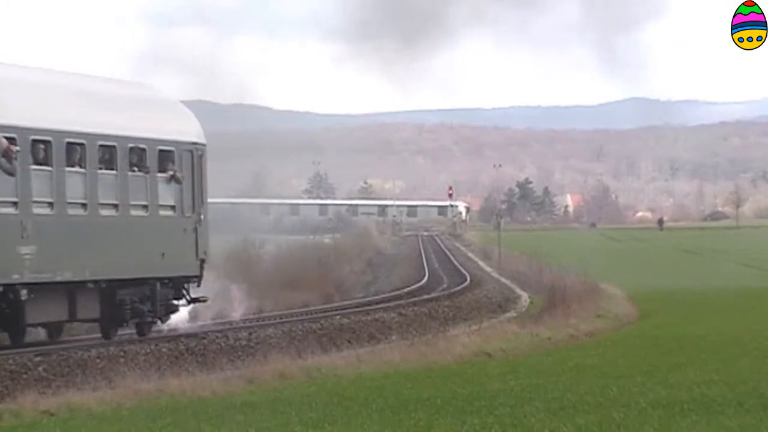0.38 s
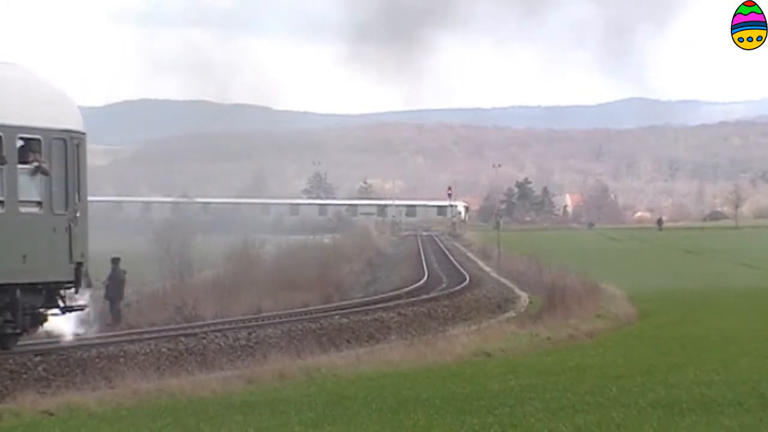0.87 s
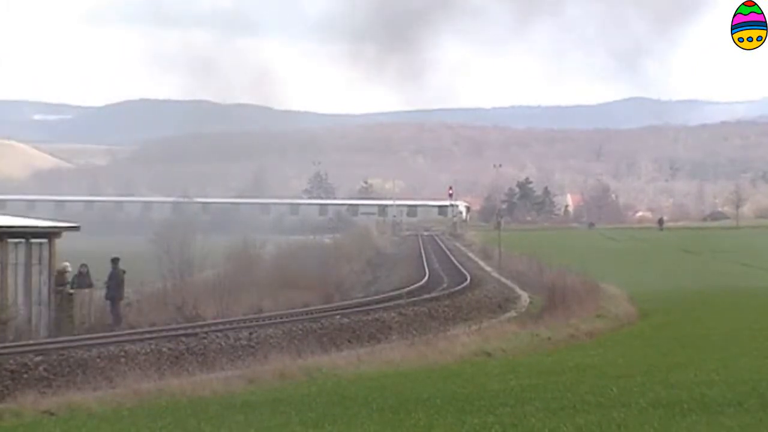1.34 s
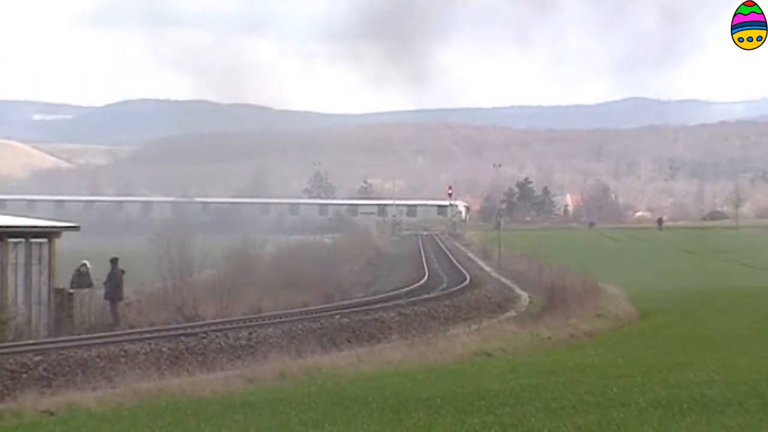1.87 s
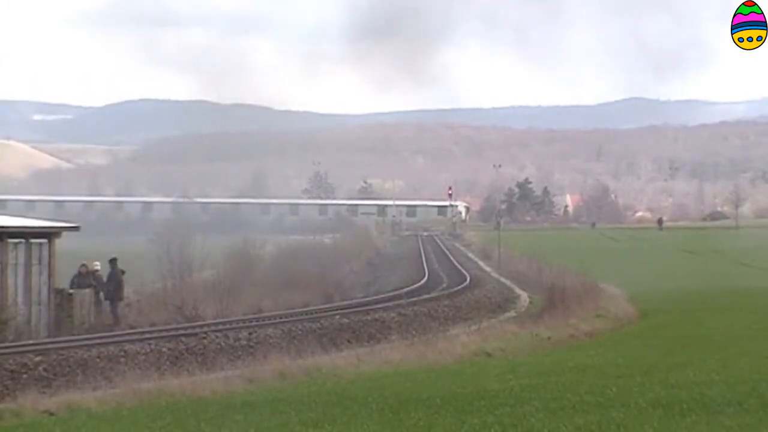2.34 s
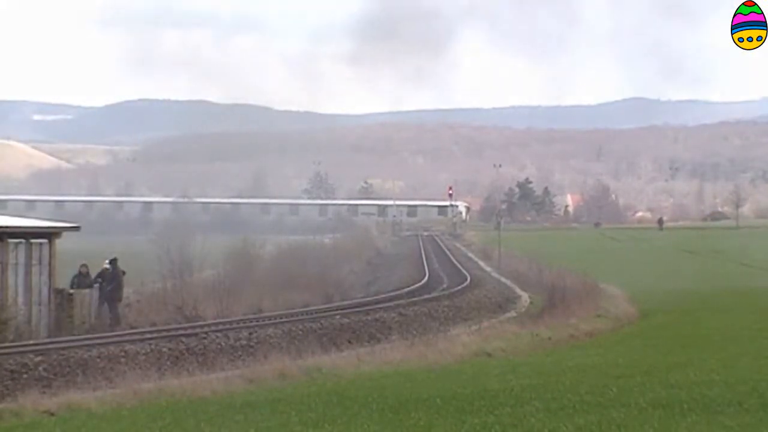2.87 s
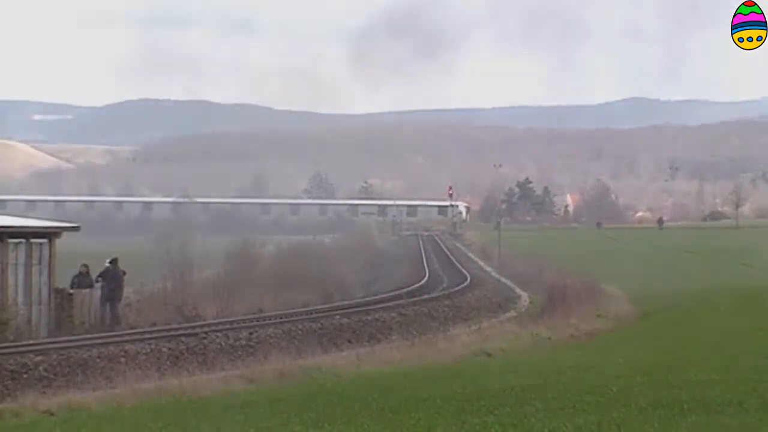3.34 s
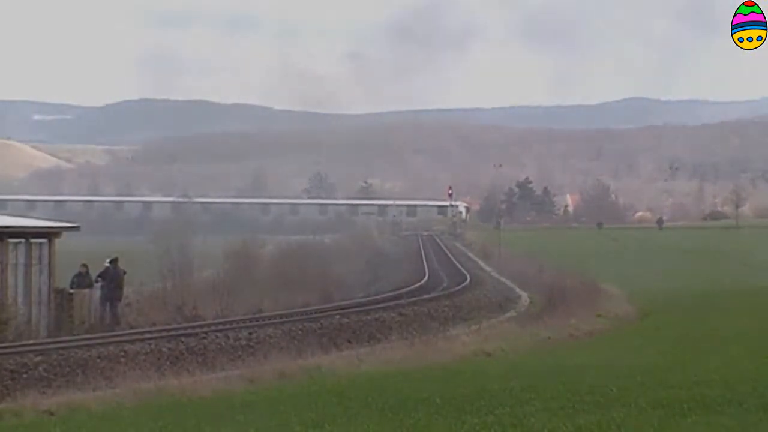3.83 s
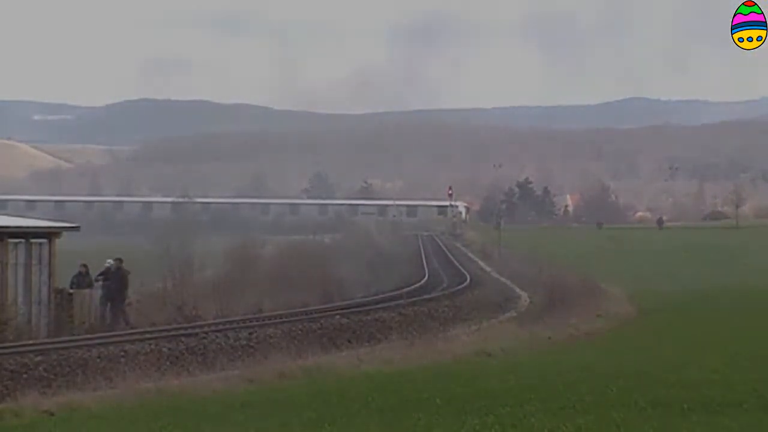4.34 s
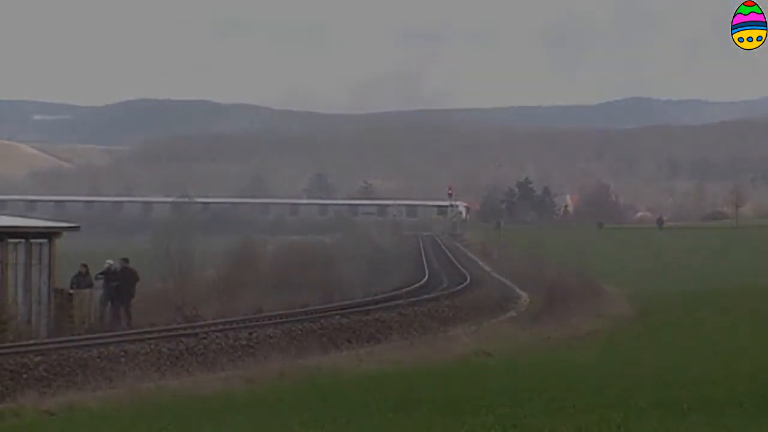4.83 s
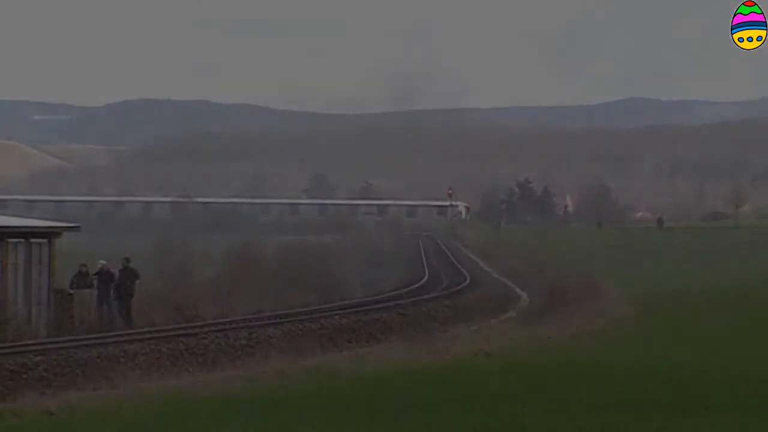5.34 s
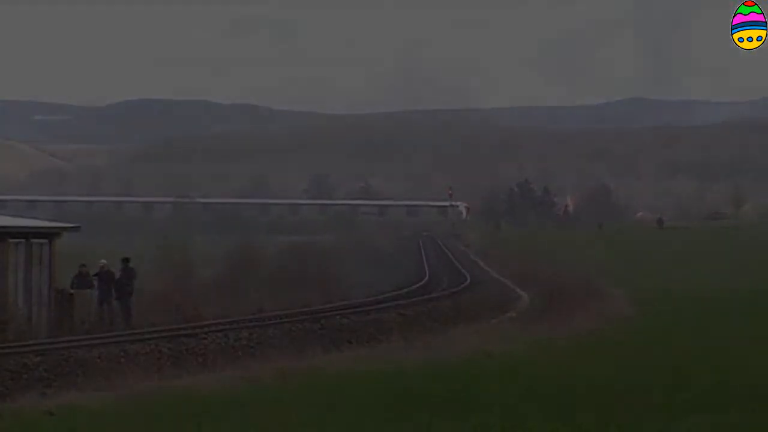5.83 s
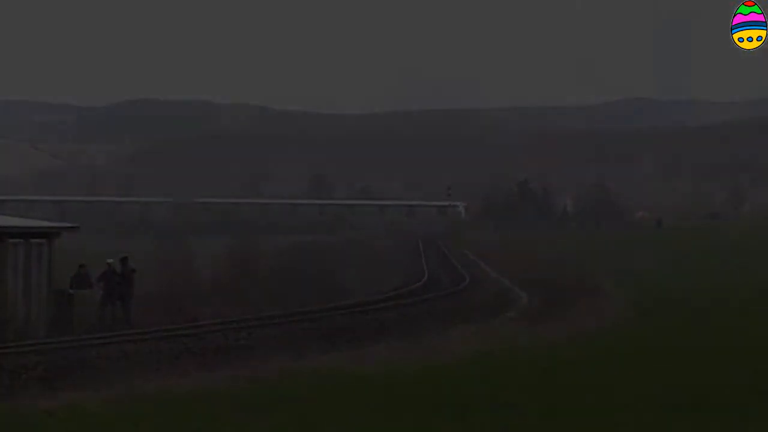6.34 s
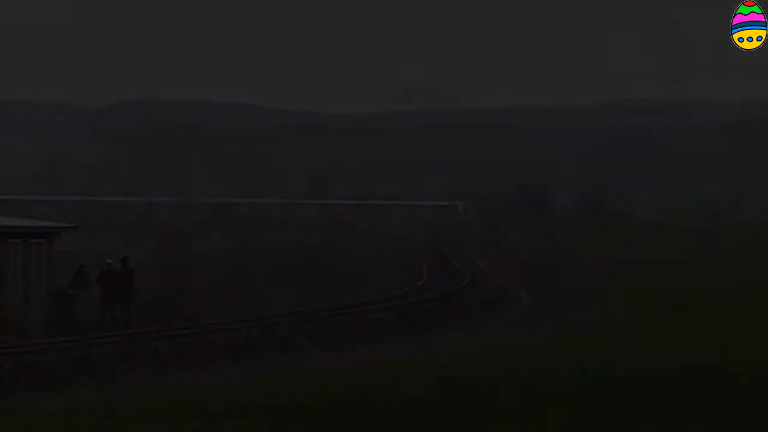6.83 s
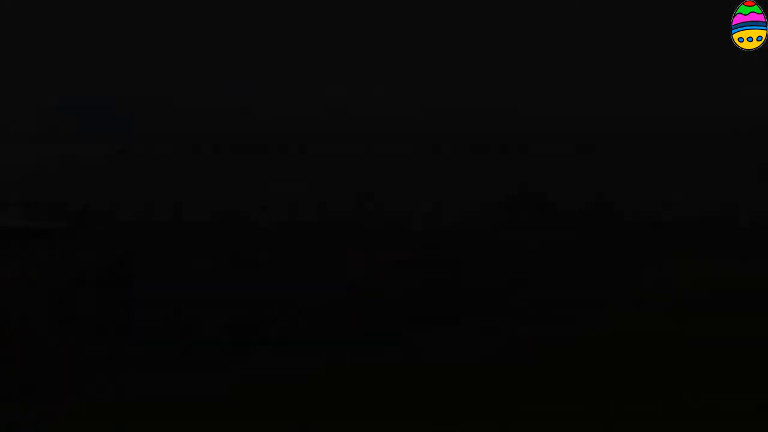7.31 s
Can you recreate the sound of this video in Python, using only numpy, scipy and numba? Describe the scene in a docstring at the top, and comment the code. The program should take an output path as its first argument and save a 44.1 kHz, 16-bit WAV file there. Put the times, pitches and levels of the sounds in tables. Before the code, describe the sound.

Last coaches of a train roar away round a curve, flanges hissing and squealing thinly, wind popping on the microphone as everything fades out.

```python
"""Last coaches leaving round a curve

The microphone stands in a field as the last coaches of a train roll away. Rails roar as coloured noise;
flanges hiss higher up, and this contact noise rings the wheels through narrow resonances.
Single modes squeal as unsteady sinking tones; scrapes and dull knocks are short puffs of resonant noise.
Wind rumbles and pops at the microphone, most knocks being the crack within a pop.
The level drops at once at times and creeps back; all fades out.
"""
import sys
import numpy as np
from scipy import signal
from scipy.fft import rfft, irfft, next_fast_len
from scipy.io import wavfile
from scipy.ndimage import uniform_filter1d
from numba import njit

SR = 44100
rng = np.random.default_rng(int(sys.argv[2]) if len(sys.argv) > 2 else 0)


def gain_from_db(level_db):
    """Convert decibel levels to linear amplitude factors (20 dB per decade)."""
    decades = np.asarray(level_db, float) / 20
    return 10 ** decades


def file_out(sig):
    """Save sig as 16-bit WAV at sys.argv[1]."""
    # one column per channel
    cols = np.atleast_2d(sig).T
    # limit, then scale
    lim = np.clip(cols, -1, 1)
    pcm = np.round(lim * 32767).astype(np.int16)
    wavfile.write(sys.argv[1], SR, pcm)


N = 339116  # samples


def at(rows):
    """Columns of a (time [s], ..) table, interpolated at every sample."""
    s, *columns = np.transpose(rows)
    return [np.interp(np.arange(N) / SR, s, column) for column in columns]


def walk(rate):
    """Random levels held for 1 / rate seconds and smoothed twice; spread near 0.7."""
    hold = int(SR / rate)
    steps = np.repeat(rng.standard_normal(N // hold + 1), hold)
    return 0.98 * uniform_filter1d(uniform_filter1d(steps, hold), hold)[:N]


def bands(colour, centres, lo_hz, hi_hz):
    """Coloured noise cut into overlapping bands; together rms 1 between lo_hz and hi_hz."""
    size = next_fast_len(N)
    hz = np.maximum(np.arange(size // 2 + 1) * SR / size, 1)
    colour_hz, colour_db = np.array(colour).T
    gain = gain_from_db(np.interp(np.log(hz), np.log(colour_hz), colour_db, left=-120, right=-120))
    zone_rms = np.sqrt(np.mean(gain ** 2 * (hz > lo_hz) * (hz < hi_hz)))
    noise = rfft(rng.standard_normal(size)) * gain / zone_rms
    for share in np.eye(len(centres)):
        yield irfft(noise * np.interp(np.log(hz), np.log(centres), share), size)[:N]


def rush(colour, centres, zone, shape, shared_db, own_db):
    """Coloured noise, each band at the dB that shape gives its centre; every band also flickers alone."""
    return sum(band * gain_from_db(shape(hz) + shared_db + own_db * walk(8))
               for hz, band in zip(centres, bands(colour, centres, *zone)))


@njit
def ring(x, hz, width):
    """Resonance with a moving centre, gain 1 at its peak."""
    y, b, l, g, k = np.empty(len(x)), 0., 0., 0., 0.
    for i in range(len(x)):
        if i % 32 == 0:
            g, k = np.tan(np.pi * hz[i] / SR), width / hz[i]
        v = (b + g * (x[i] - l)) / (1 + g * (g + k))
        b, l, y[i] = 2 * v - b, l + 2 * g * v, k * v
    return y


def bursts(rows, width, pop, rise):
    """Puffs of noise that swell and die, each led by a sharp push, through a broad resonance."""
    out, t = np.zeros(N + SR), np.arange(SR // 4) / SR
    for s, db, hz, tail in rows:
        swell = np.minimum(t / (rise * tail + 1 / SR), 1)  # longer puffs start more gently
        hiss = rng.standard_normal(len(t)) * swell * gain_from_db(-60 * t / max(tail, .002))
        push = hiss + pop * np.sqrt(SR / hz) * (t == 0)
        tone = np.full(len(t), 1. * hz)
        puff = ring(ring(push, tone, width * hz), tone, width * hz)
        out[int(s * SR):][:len(t)] += puff * gain_from_db(db) / np.abs(puff).max()
    return out[:N]


def away():
    """0 while the coaches are near the microphone, 1 once they have drawn off."""
    leaves_s, gone_s = 4.16, 4.7
    return at([(leaves_s, 0.), (gone_s, 1.)])[0]


# rolling roar: (time [s], level around 1 kHz before hum and flicker [dB], tilt above it [dB per octave])
ROLL = [(0, -26.5, 3.5), (0.4, -29, 3.5), (0.75, -26.5, 3), (1.0, -27.5, 4), (1.4, -31.5, 4),
        (1.7, -29.5, 4), (2.0, -31.5, 3.5), (2.4, -34, 4), (2.6, -36.5, 5), (2.95, -31.5, 4),
        (3.25, -29, 3.5), (3.42, -34.5, 4), (3.7, -29, 2.5), (3.9, -25, 1), (4.3, -27.5, 2.5),
        (4.57, -26.5, 0.9), (5.0, -28.5, -0.5), (5.2, -29.5, -1), (5.5, -30, 0), (6.0, -33, -0.1),
        (6.5, -31, 1), (7.0, -32.5, -0.5), (7.69, -35.5, -2.5)]
# spectrum of rough tread on rough rail: (frequency [Hz], relative density [dB per Hz])
ROLL_COLOUR = [(24, -84), (40, -58.5), (149, -27), (295, -8), (344, -8.5), (401, -3.5), (694, 2),
               (1600, -2), (2590, -2), (2890, -5), (3370, -4.5), (4690, -15), (5590, -18), (6100, -16),
               (7600, -24.5), (9880, -45), (16700, -120)]
# broad hum of the rail: (time [s], lift at the middle of the hum [dB])
HUM = [(0, -0.5), (1.0, -1), (2.0, -1), (2.6, 2.5), (2.9, 3), (3.3, 3.5), (3.9, 1), (4.25, 0), (4.6, 2.5),
       (4.9, 2), (5.3, -1), (5.8, 1.5), (6.1, -0.5), (7.69, -2.5)]


def rails():
    """Rolling roar: rough treads on rough rail, throbbing a little; distance dulls the treble."""
    hum_hz, hum_octaves = 765, 0.4
    rims_far_db = -2.5  # far off, the roar steps down above 2.7 kHz
    centres = 120 * 2 ** np.arange(0, 6.1, 1 / 3)
    level_db, tilt_db = at(ROLL)
    step_db, hum_db = rims_far_db * away(), at(HUM)[0]

    def shape(hz):
        tilt = tilt_db * np.clip(np.log2(hz / 1000), 0, 2.6)
        hum = hum_db * np.exp(-(np.log2(hz / hum_hz) / hum_octaves) ** 2)
        return level_db + tilt + step_db * (hz > 2700) + hum

    return rush(ROLL_COLOUR, centres, (700, 1400), shape, shared_db=1.04 * walk(14), own_db=1.38)


# pressure of the flanges: (time [s], hiss level around 11 kHz before flicker [dB], lean [dB per octave])
FLANGE = [(0, -24.5, -13), (.3, -21.5, -4.5), (.75, -24, -4.5), (1.2, -21, -3), (1.6, -21, -7),
          (2.0, -22.5, -3), (2.45, -20.5, 4), (2.8, -22.5, 5), (3.1, -23.5, -10), (3.5, -23.5, 1),
          (3.7, -25, 17), (3.95, -34.5, -2), (4.3, -32, -1), (4.56, -37.5, -14), (4.6, -40, -2),
          (4.85, -47.5, 6), (5.2, -41.5, 5), (5.3, -31.5, 0.5), (5.55, -29, 7), (5.85, -36.5, 3),
          (6.15, -40.5, 4), (6.4, -33, 1.5), (6.8, -37, 3), (6.95, -41, 6), (7.04, -40, 6), (7.06, -35, 11),
          (7.14, -31, 11), (7.35, -35.5, 10), (7.69, -45, 2)]
# spectrum of sliding steel: (frequency [Hz], relative density [dB per Hz])
FLANGE_COLOUR = [(4350, -43.5), (7400, -6.5), (7950, -4.5), (9680, -1.5), (11000, 1.5), (11500, 0.5),
                 (13100, -9), (14700, -9.5), (15600, -16.5)]


def flanges():
    """Steel sliding on steel: a high shivering hiss that loses its sharp peak as the coaches leave."""
    near_db, far_db = -2.5, 10  # per octave to either side of 10.7 kHz, on top of the colour
    # late, the hiss has a sharp lower edge at 7.5 kHz with a flat, weaker shelf below
    foot_db, under_db, skirt_db = 21.5, 6.5, -10  # for the three lowest bands
    centres = np.r_[4700, 5800, 7250, 7800 * 2 ** np.arange(0, 1.01, .2)]
    level_db, lean_db = at(FLANGE)
    late = away()
    spread_db = near_db + (far_db - near_db) * late

    def shape(hz):
        octaves = np.log2(hz / 10700)
        shelf = foot_db * (hz == centres[0]) + under_db * (hz == centres[1]) + skirt_db * (hz == centres[2])
        return level_db + lean_db * min(octaves, .3) + spread_db * abs(octaves) + late * shelf

    return rush(FLANGE_COLOUR, centres, (9300, 12200), shape, shared_db=0.91 * walk(16), own_db=1.8)


# ringing modes of a wheel disc before pitch shift and flicker:
# (frequency [Hz], width [Hz], lift over the noise that drives it [dB])
WHEEL = [(737, 35, -17.5), (900, 110, -9), (1828, 66, -5.5), (2480, 26, -4.5), (3155, 52, -6.5),
         (4140, 59, -3), (5090, 28, -4.5), (5980, 45, 0), (6850, 45, 4), (7800, 35, 3), (8900, 57, 0.5),
         (9730, 46, 2.5), (10240, 60, 0), (10800, 130, -5.5), (11340, 50, -2.5), (12200, 50, 1.5),
         (12460, 40, 7), (13500, 50, 2.5), (14050, 50, -1), (14750, 50, 0)]
# the wheels heard best, one bogie after another: (time [s], pitch factor from their motion [ratio])
RUBS = [(0, 1.01), (1.68, 1.001), (1.7, 1.04), (2.5, 1.033), (3.25, 1.025), (3.75, 1.012), (4.1, 1.001),
        (4.9, .99), (7.69, .982)]


def wheels(contact):
    """The contact noise rings the disc modes; each mode catches and lets go at its own moments."""
    factor, = at(RUBS)
    far_db = -6 * away()  # far off, the high modes sink into the hiss

    def lift(hz, db):
        return gain_from_db(db + 3.7 * walk(9) + far_db * np.clip(np.log2(hz / 3000), 0, 1))

    return sum(ring(contact, hz * factor, 1. * width) * lift(hz, db) for hz, width, db in WHEEL)


# spectrum of wind rumble: (frequency [Hz], relative density [dB per Hz])
GUST_COLOUR = [(18, -80), (40, -45), (70, -21), (140, -0.5), (230, 1), (378, -1.5), (600, -8), (900, -12.5),
               (1400, -19.5), (2200, -39), (4000, -120)]
# steady wind: (time [s], rumble level before the trim in wind() [dB])
BREEZE = [(0, -54), (1.9, -54), (2.3, -59), (2.85, -67), (3.4, -51), (5.0, -53), (6.5, -48), (7.69, -39)]
# gusts: (middle time [s], rumble level before the trim in wind() [dB], half length [s])
GUSTS = [(0.77, -43, 0.022), (1.003, -49, 0.021), (1.605, -46, 0.04), (3.092, -43.5, 0.15),
         (3.876, -37, 0.038), (4.8, -44, 0.056), (5.18, -37, 0.04), (5.3, -30, 0.022), (5.35, -27, 0.028),
         (5.409, -32, 0.017), (5.797, -30, 0.041), (5.98, -31, 0.049), (6.22, -34, 0.065),
         (6.58, -22, 0.014), (6.635, -22, 0.026), (6.7, -30, 0.012), (6.756, -23, 0.028),
         (6.793, -21, 0.008), (6.85, -23, 0.026), (6.93, -30, 0.012), (7.147, -30, 0.039),
         (7.28, -33.5, 0.029), (7.38, -39, 0.048)]
# pops of wind on the microphone: (time [s], peak level [dB], pitch [Hz])
BUFFETS = [(3.044, -20, 463), (3.88, -21, 519), (4.782, -20.5, 272), (5.179, -22, 371), (5.3, -25, 250),
           (5.353, -21, 380), (5.375, -24, 300), (5.41, -26, 245), (5.777, -18, 334), (5.791, -16, 342),
           (5.904, -21, 202), (5.951, -14, 431), (5.964, -19, 285), (6.176, -10.5, 367),
           (6.217, -12.5, 312), (6.228, -15, 330), (6.565, -7, 310), (6.579, -6, 256), (6.625, -12, 398),
           (6.756, -14, 326), (6.765, -14, 509), (6.829, -10, 238), (6.841, -17, 406), (7.377, -12, 431),
           (7.414, -19, 303), (7.487, -18.5, 334), (7.562, -18.0, 312)]


def wind():
    """Low turbulence at the microphone: lumpy rumble that swells in gusts, and single pops."""
    trim_db, flutter_s = -6.0, 0.034  # the noise in each pop falls 60 dB in flutter_s
    t = np.arange(N) / SR
    breeze = gain_from_db(at(BREEZE)[0] + 2.0 * walk(9))
    gusts = sum(gain_from_db(db) * np.exp(-((t - s) / half) ** 4) for s, db, half in GUSTS)
    layers = bands(GUST_COLOUR, [90, 180, 360], lo_hz=70, hi_hz=269)
    rumble = sum(band * gain_from_db(2.0 * walk(30)) for band in layers)
    pops = [(s, db, hz, flutter_s) for s, db, hz in BUFFETS]
    return rumble * (breeze + gusts) * gain_from_db(trim_db) + bursts(pops, width=0.84, pop=0.93, rise=0.031)


# a flange jams and the upper modes of a wheel sing at once:
# (time [s], length [s], middle level at 10 kHz [dB], slope away from 10 kHz [dB per octave])
JAMS = [(1.93, .1, -42, -8), (3.55, .12, -49, -4), (4.135, .055, -38, -2), (4.46, .1, -49, -2.5)]


def caught_modes():
    """Squeal rows for jams, which sound all upper modes, and for faint strays, which pick one at random."""
    strays, from_s, to_s = 100, 0.36, 3.75
    stray_db, off_peak_db = -41, -7.5  # middle level at 10 kHz; slope per octave away from there
    modes, (rub_s, factor) = np.array(WHEEL)[3:, 0], np.transpose(RUBS)
    rows = [(s, length, hz, db + 4.6 * rng.standard_normal(), off_db)
            for s, length, db, off_db in JAMS for hz in modes]
    for when, which, long, loud in rng.random((strays, 4)):
        s = from_s + when * (to_s - from_s)
        hz = modes[int(which * len(modes))]
        rows.append((s, 0.052 + 0.25 * long, hz, stray_db + 6 * (loud - .5), off_peak_db))
    return [(s, length, hz * np.interp(s, rub_s, factor), db + off_db * abs(np.log2(hz / 10000)))
            for s, length, hz, db, off_db in rows]


def wander(t, rate, points):
    """Random line through normal values, rate of them a second."""
    return np.interp(t * rate, np.arange(points), rng.standard_normal(points))


# single modes that squeal out:
# (time [s], length [s], mid-length frequency before waver [Hz], rms level before flicker and slips [dB])
SQUEALS = [(0.01, 0.046, 8460, -23), (0.268, 0.47, 19000, -41.5), (0.487, 0.14, 9860, -32),
           (0.84, 0.055, 4200, -33), (0.79, 0.03, 4170, -37), (0.86, 0.07, 5060, -41),
           (1.0, 0.25, 4150, -41), (0.79, 0.065, 3320, -29), (0.87, 0.04, 3260, -33),
           (0.968, 0.1, 3290, -33), (0.829, 0.14, 10600, -30), (0.98, 0.06, 6870, -39),
           (1.05, 0.07, 6840, -34), (1.12, 0.12, 3290, -30), (1.24, 0.095, 3270, -33),
           (1.41, 0.09, 3420, -36), (1.135, 0.065, 5020, -33.5), (1.18, 0.39, 8800, -35.5),
           (1.28, 0.17, 13750, -35), (1.7, 0.07, 11390, -30), (1.8, 0.45, 11320, -28.0),
           (2.28, 0.34, 11220, -25), (2.64, 0.26, 11110, -27), (2.92, 0.15, 10980, -32),
           (1.72, 0.45, 10110, -34), (1.777, 0.074, 3350, -35), (1.26, 0.08, 5920, -38),
           (1.29, 0.06, 6950, -39), (1.87, 0.25, 9050, -40), (1.918, 0.096, 2555, -27.5),
           (2.139, 0.26, 2590, -36), (1.952, 0.2, 9800, -36.5), (2.201, 0.19, 3360, -36),
           (2.4, 0.5, 2580, -39), (1.951, 0.44, 8220, -36), (2.068, 0.088, 3110, -31.5),
           (2.11, 0.22, 14240, -42), (2.13, 0.12, 5030, -38), (2.38, 0.43, 10600, -32),
           (2.392, 0.42, 9080, -35), (2.4, 0.1, 14540, -33), (2.5, 0.15, 14480, -41),
           (2.73, 0.1, 14430, -41), (2.12, 0.1, 12350, -34), (2.27, 0.05, 12950, -35),
           (2.41, 0.08, 12250, -35), (1.96, 0.07, 14680, -40), (2.73, 0.06, 11650, -33),
           (2.55, 0.45, 8110, -36), (2.83, 0.56, 6980, -40), (3.6, 0.25, 6300, -42), (2.4, 0.26, 5230, -47),
           (1.43, 0.08, 10730, -33.5), (2.858, 0.13, 10900, -38), (2.95, 0.383, 2570, -36.5),
           (2.952, 0.307, 2900, -40), (3.07, 0.34, 8080, -30.5), (3.09, 0.1, 8600, -35.5),
           (3.12, 0.42, 9900, -33), (3.078, 0.32, 6300, -39), (3.19, 0.43, 8100, -30),
           (3.26, 0.39, 10820, -28), (3.4, 0.33, 12800, -37.0), (3.5, 0.1, 3340, -34),
           (3.423, 0.5, 2560, -37), (3.55, 0.12, 5080, -39.5), (3.58, 0.045, 4210, -35),
           (3.77, 0.1, 2550, -34), (3.76, 0.13, 3700, -39), (3.56, 0.12, 6030, -41),
           (4.27, 0.26, 10480, -41), (4.47, 0.09, 4990, -39), (5.897, 0.185, 10750, -41)]


def squeals(edge_s=.015, sink=0.02):
    """Modes held by stick and slip: unsteady tones that sink as the wheel draws away."""
    waver_share, flicker_db, rasp, slip_db = .0022, 2.5, .6, 2.5
    out = np.zeros(N)
    for s, length, hz, db in SQUEALS + caught_modes():
        span = slice(max(int((s - edge_s) * SR), 0), int((s + length + edge_s) * SR))
        t = np.arange(span.start, span.stop) / SR - s
        grip = np.clip(np.minimum(t + edge_s, length + edge_s - t) / (2 * edge_s), 0, 1)
        # the contact patch changes some 70 times a second
        waver, flicker = wander(t, 70, 128), wander(t, 70, 128)
        # quick slips roughen high tones most
        grain = 1 + rasp * np.sqrt(max(hz, 5000) / 5000) * wander(t, 220, 400)
        slip = slip_db * np.minimum(wander(t, 28, 40), .6)  # the grip lets go for moments
        pitch = hz * (1 - sink * (t - length / 2) + waver_share * waver)
        tone = np.sqrt(2) * np.sin(2 * np.pi * np.cumsum(pitch) / SR)
        out[span] += tone * grip * grain * gain_from_db(db + flicker_db * flicker + slip)
    return out


# dull knocks, most of them the crack within a wind pop:
# (time [s], peak level [dB], centre [Hz], time for the driving noise to fall 60 dB [s])
KNOCKS = [(0.772, -11.5, 1290, 0.11), (5.234, -18, 950, 0.03), (5.361, -18, 800, 0.03),
          (5.78, -20, 795, 0.04), (5.828, -18, 900, 0.04), (5.951, -18, 800, 0.039),
          (6.135, -20, 1980, 0.08), (6.219, -12.5, 900, 0.03), (6.231, -20, 800, 0.04),
          (6.563, -18, 1200, 0.02), (6.626, -18, 900, 0.04), (6.752, -16, 1000, 0.03),
          (6.768, -19, 1100, 0.04), (6.808, -15, 600, 0.025), (6.836, -9, 950, 0.025),
          (7.377, -19, 700, 0.03)]


def knocks():
    """Dull knocks, most of them the crack within a wind pop: short puffs, each led by a marked push."""
    return bursts(KNOCKS, width=0.85, pop=0.65, rise=0.02)


# short scrapes of a flange:
# (time [s], peak level [dB], centre [Hz], time for the driving noise to fall 60 dB [s])
SCRAPES = [(2.53, -9, 11200, 0.13), (2.66, -10.5, 12500, 0.2), (4.12, -9.5, 12200, 0.29),
           (4.547, -17, 11600, 0.03), (4.569, -11.5, 7800, 0.015), (4.571, -15, 5000, 0.015),
           (4.931, -25.5, 10400, 0.06), (4.968, -23, 10500, 0.11), (5.145, -24, 10480, 0.096),
           (5.278, -20, 10400, 0.1), (5.378, -22, 5600, 0.04), (5.45, -16, 11000, 0.12),
           (5.548, -9, 10300, 0.18), (6.165, -24, 9550, 0.06), (7.115, -12.5, 10500, 0.14)]


def scrapes():
    """Short scrapes of a flange: bright puffs of noise with a slight push at the start."""
    return bursts(SCRAPES, width=0.69, pop=.15, rise=0.053)


# sudden drops of level: (time [s], drop [dB])
DROPS = [(2.431, -3), (4.573, -0.5), (6.18, -6.5), (6.567, -11.5), (6.78, -6.5), (7.49, -4), (7.567, -4)]


def loudness():
    """Sudden drops that creep back, and the closing straight fall of amplitude to silence."""
    recover_s, fade_from_s, fade_to_s = 0.32, 3.0, 7.625
    t = np.arange(N) / SR
    drop_db = sum(db * (t >= s) * np.exp(-np.abs(t - s) / recover_s) for s, db in DROPS)
    return gain_from_db(drop_db) * np.clip((fade_to_s - t) / (fade_to_s - fade_from_s), 0, 1)


def scene():
    """All sources reach one microphone, heard alike on both channels."""
    contact = rails() + flanges()
    mono = contact + wheels(contact) + wind() + squeals() + knocks() + scrapes()
    return np.array([mono, mono])


def low_pass(x):
    """Removes everything above the highest recorded frequency."""
    return signal.sosfilt(signal.butter(12, 15750, fs=SR, output="sos"), x)


def record(dry):
    """The microphone's signal with level drops and fade, then the deepest bass cut."""
    low_cut = signal.butter(4, 68., "high", fs=SR, output="sos")
    mix = signal.sosfilt(low_cut, dry * loudness())
    return low_pass(mix)


dry = scene()
out = record(dry)
file_out(out)
```